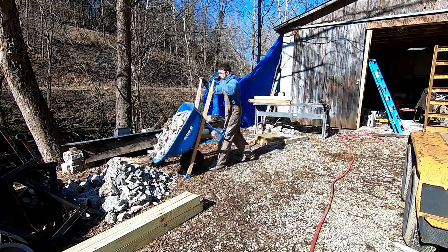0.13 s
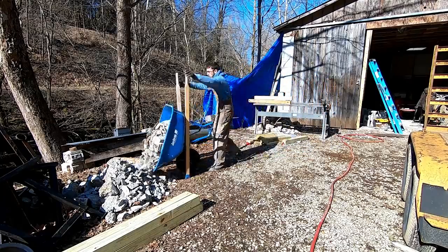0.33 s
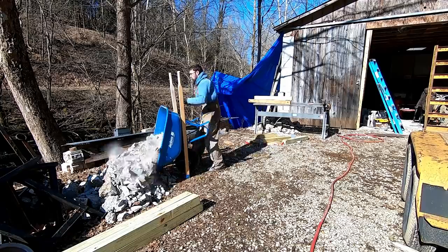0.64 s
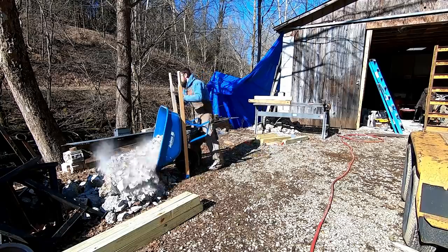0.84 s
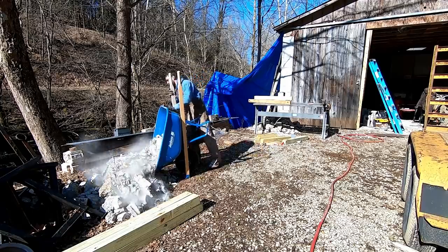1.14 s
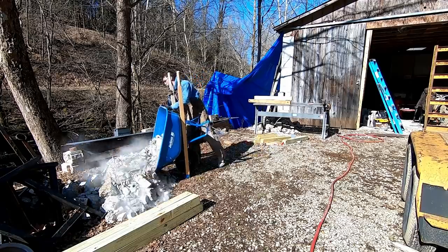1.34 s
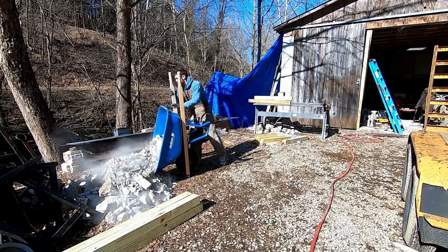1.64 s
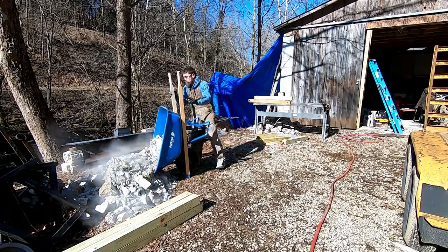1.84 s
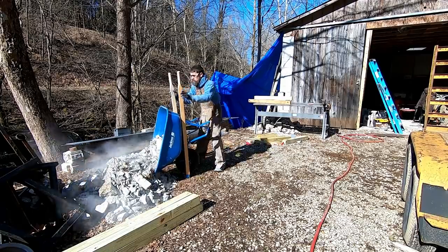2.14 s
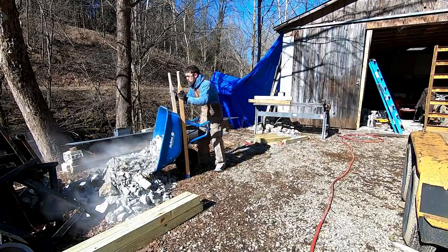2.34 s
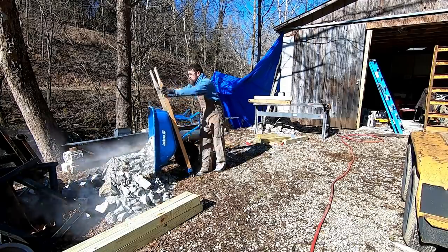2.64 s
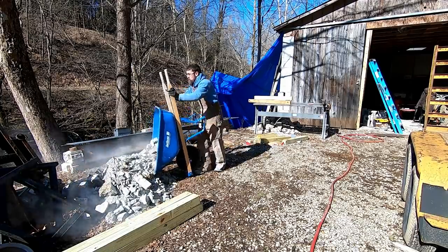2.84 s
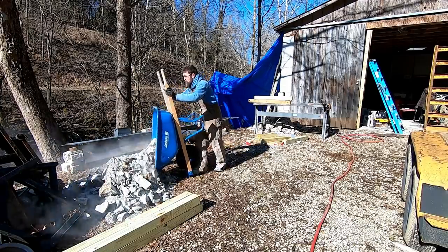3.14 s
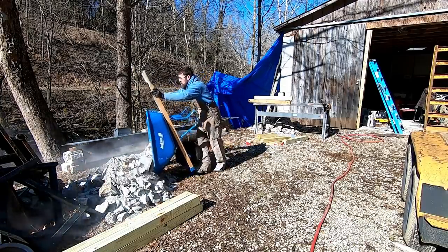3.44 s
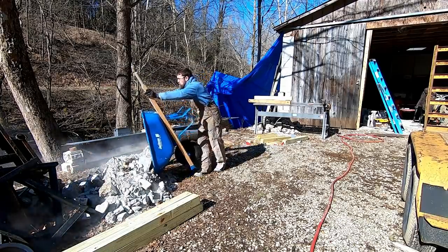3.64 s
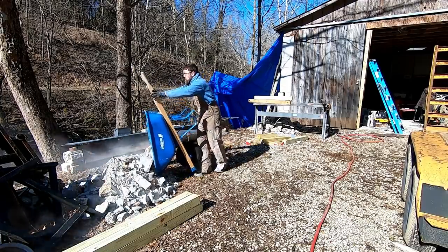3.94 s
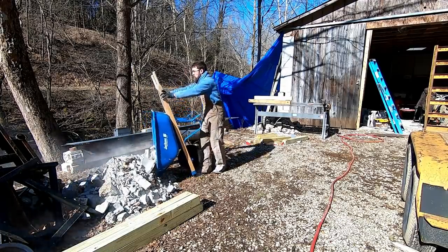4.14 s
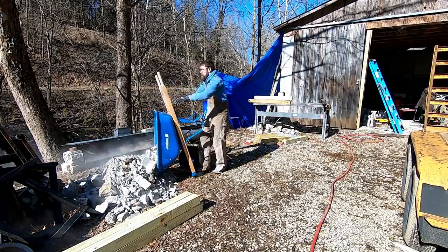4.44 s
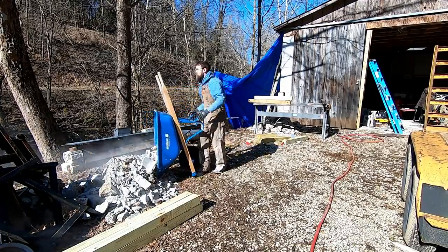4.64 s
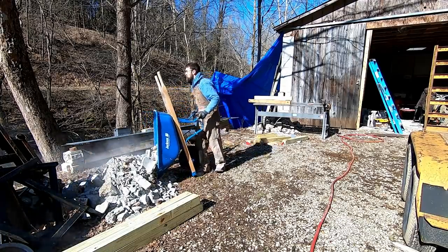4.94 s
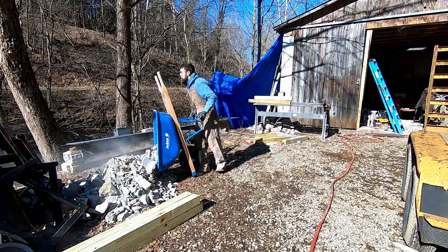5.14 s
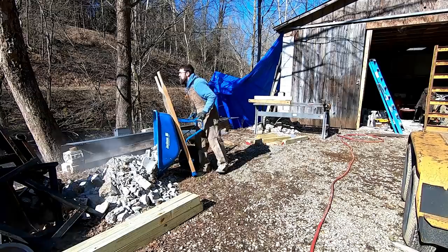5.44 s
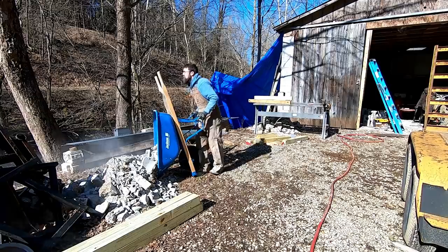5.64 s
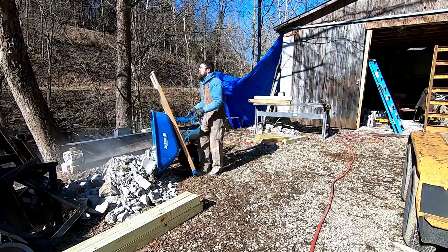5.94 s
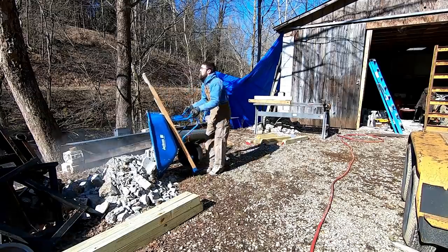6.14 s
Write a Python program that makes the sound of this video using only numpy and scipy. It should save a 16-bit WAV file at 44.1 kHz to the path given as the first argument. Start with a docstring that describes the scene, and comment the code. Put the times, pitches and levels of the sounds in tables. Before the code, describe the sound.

In an open gravel yard, concrete rubble is already sliding from a steel wheelbarrow at 0 s. It swells into a dense clatter from 0.2 to 0.6 s, with hollow tub drumming, sharp block knocks, pouring grit and a bright clink near 0.5 s. A hard double crack lands around 0.9 s, then scattered knocks and a thin squeal as it thins, with smaller tumbles at 1.4 and 1.7 s. From 2 to 2.4 s only faint ticks remain. Rocking begins near 2.5 s; a heavy, hollow knock at 2.9 s leads into scraping, knocks and clinks until about 4.3 s. Small clicks and light gravel crunches follow, quiet until a fresh scraping slide at 6 s. Low wind rumbles on the microphone throughout, with stronger buffeting from about 4 s. The yard adds only a short, diffuse tail over a faint airy wash.

```python
"""Broken concrete slides out of a tipped wheelbarrow onto a rubble pile, outdoors on a gusty day.
Blocks knock, shards clink and grit pours; after a lull the barrow is rocked and the rest scrapes out.
The slide is thousands of short damped rings and noise; blocks, shards and scuffs are placed one by one.
The yard scatters the rubble's sound; low filtered noise is the wind buffeting the microphone throughout."""
import sys
import numpy as np
from scipy import signal
from scipy.fft import rfft, irfft, next_fast_len
from scipy.io import wavfile
from scipy.ndimage import uniform_filter1d

SR = 44100
rng = np.random.default_rng(int(sys.argv[2]) if len(sys.argv) > 2 else 0)


def generate_wav(sig):
    """Save sig (samples, or channels by samples) to the path in sys.argv[1] as 16-bit PCM at SR."""
    pcm = np.round(np.clip(np.atleast_2d(sig).T, -1, 1) * 32767).astype(np.int16)
    wavfile.write(sys.argv[1], SR, pcm)


N = 277830
TIME = np.arange(N) / SR

# resonances of the steel tub: f/Hz, width/Hz, lift/dB (negative is a dip)
TUB = [(395, 42, 3), (569, 18, 2.5), (835, 49, 4), (990, 61, 4.5), (1275, 19, 3.5), (1460, 110, 1),
       (1660, 13, -2.5), (1790, 41, 3.5)]
# colour of the grit and of a shard's tick: f/Hz, level/dB
GRIT_COLOUR = [(1200, 0.5), (2400, 0.5), (3300, -0.5), (5000, -3), (6300, -4), (7000, -6.5), (8400, -2.5),
               (9300, -4.5), (10200, -14.5), (11300, -10), (12700, -10), (14300, -12.5), (16000, -21)]


def amp(db):
    """Decibels to gain."""
    return 10 ** (np.asarray(db) / 20)


def evened(x):
    """Scales to rms 1."""
    return x / np.sqrt(np.mean(x ** 2) + 1e-20)


def coloured(x, points, peaks=()):
    """Filters by a smooth spectrum with optional resonant peaks."""
    size = next_fast_len(len(x) + 2048)
    hz = np.fft.rfftfreq(size, 1 / SR)
    point_hz, point_db = np.transpose(points)
    shape_db = np.interp(np.log(hz + 1), np.log(point_hz + 1), point_db)
    for centre, width, lift_db in peaks:
        shape_db = shape_db + lift_db / (1 + (2 * (hz - centre) / width) ** 2)
    return irfft(rfft(x, size) * amp(shape_db), size)[:len(x)]


def steadied(x, size):
    """Holds the rms near 1 over windows of size samples, keeping the faster detail."""
    power = uniform_filter1d(uniform_filter1d(x ** 2, size), size)
    return x / np.sqrt(abs(power) + 1e-4 * np.mean(x ** 2))


def add(mix, s, sound):
    """Mixes a sound in at time s."""
    part = mix[max(round(s * SR), 0):][:len(sound)]
    part += sound[:len(part)]


def slide():
    """Chunks drum on the tub and tumble over each other while grit pours between them."""
    # colour of the drumming tub: f/Hz, level/dB
    drum_colour = [(80, -59), (160, 1), (225, -7.5), (300, -2), (380, -1), (540, 0.5), (720, -4),
                   (1400, -18)]
    # colour of the tumbling chunks: f/Hz, level/dB
    chunk_colour = [(250, -20), (480, -12), (680, -1.5), (1300, 0), (1900, -3), (2700, -8.5), (3700, -17),
                    (7000, -15.5)]
    # narrow rings that the small shards share: f/Hz, width/Hz, lift/dB (negative is a dip)
    shard_rings = [(4370, 24, 3.5), (5150, 51, 4.5), (5860, 53, 6.5), (6320, 38, 1), (8100, 40, 5),
                   (8500, 22, -5), (12600, 70, 5)]
    slips_per_s, slip_fall_s, slip_depth = 61, .012, 0.66
    drum_db, drum_power, max_coarseness = -6.5, 0.78, 1.16

    drum = collisions(100, 1000, cycles=1.2, spread_db=2.5, count=6000, size=700)
    chunks = collisions(400, 5000, cycles=1.9, spread_db=3.8, count=13000, size=450)
    chips = collisions(1890, 18100, cycles=1.6, spread_db=5.0, count=16000, size=128)
    shards = collisions(2500, 13000, cycles=40, spread_db=3.8, count=1300, size=2200)
    grit = chips + amp(-1.0) * shards + amp(7.5) * rng.standard_normal(N)

    # the load moves in small slips, each a sudden rise and a quick fall shared by all stone sizes
    slips = (rng.random(N) < slips_per_s / SR) * rng.exponential(1, N)
    slipping = signal.lfilter([1], [1, -np.exp(-1 / (slip_fall_s * SR))], slips)
    surge = np.sqrt(1 + slip_depth * slipping)

    # the tub drums with the chunks, more so the more they outweigh the grit, up to a limit
    chunk_gain, grit_gain = flow()
    coarseness = np.minimum(chunk_gain / grit_gain, max_coarseness)
    drum_gain = amp(drum_db) * chunk_gain * coarseness ** drum_power

    drumming = steadied(coloured(drum * surge, drum_colour, TUB), size=2800)
    tumbling = steadied(coloured(chunks * surge, chunk_colour, TUB), size=2400)
    pouring = steadied(coloured(grit * surge, GRIT_COLOUR, shard_rings), size=2400)
    return drum_gain * drumming + amp(-2.28) * chunk_gain * tumbling + amp(0.5) * grit_gain * pouring


def flow():
    """Gains of chunks and grit: the dump, then the scraping, with collapses that rise, hold and die away."""
    # the load runs out and trickles to rest, before the layer trims: t/s, chunks level/dB, grit level/dB
    dump = [(0, -24.5, -26.5), (0.1, -23, -26.5), (0.22, -18, -25), (0.5, -17.5, -19), (0.8, -35, -25.5),
            (1.25, -37.5, -32), (1.69, -32, -35.5), (1.8, -41, -43), (1.97, -41.5, -43.5), (2.08, -62, -52),
            (2.37, -57, -52.5)]
    # rubble while the barrow is rocked and dragged free, before each size's share: t/s, level/dB
    scrape = [(2.45, -40), (2.55, -37.5), (2.7, -36.5), (2.8, -30.5), (3.15, -29.5), (3.42, -25),
              (3.6, -27), (3.83, -30.5), (3.97, -26), (4.24, -27.5), (4.4, -38), (4.6, -40), (5.15, -42),
              (5.45, -47), (5.8, -45.5), (5.88, -40), (5.98, -27), (6.3, -33)]
    # heaps of chunks that give way together, before the layer trims: t/s, time from start to fall/s, level/dB
    collapses = [(0.22, 0.21, -37), (0.85, .035, -34), (1.405, 0.076, -41), (1.677, 0.032, -30),
                 (2.491, 0.11, -32.5), (2.78, 0.11, -25.5), (3.033, 0.074, -24.5), (3.38, 0.079, -20.5),
                 (3.663, 0.051, -22.5), (4.633, 0.027, -29.5), (5.035, 0.049, -36), (5.96, 0.063, -22),
                 (6.123, 0.047, -22.5)]
    chunks_share_db, grit_share_db = 2, 1.5
    rise_s, fall_s, collapse_grit_db = 0.018, 0.022, -10.5

    scraping = [(s, db + chunks_share_db, db + grit_share_db) for s, db in scrape]
    times, chunks_db, grit_db = np.vstack([dump, scraping]).T
    heaps = 0
    for s, hold, db in collapses:
        rise = np.clip((TIME - s) / rise_s, 0, 1)
        fall = np.exp(-np.maximum(TIME - s - hold, 0) / fall_s)
        heaps = heaps + amp(db) * rise * fall
    chunk_gain = np.hypot(amp(np.interp(TIME, times, chunks_db)), heaps)
    grit_gain = np.hypot(amp(np.interp(TIME, times, grit_db)), amp(collapse_grit_db) * heaps)
    return chunk_gain, grit_gain


def collisions(low_hz, high_hz, cycles, spread_db, count, size):
    """A hail of stone contacts: each a short damped ring with its own pitch and force."""
    when, pitch, damping, force, side = rng.random((count, 5)).T
    hz = low_hz * (high_hz / low_hz) ** pitch
    life = np.minimum(cycles * (.5 + damping) / hz * SR, size / 4)  # samples; higher rings die sooner
    force_db = spread_db * np.minimum(-np.log(1 - force), 4.5)  # few contacts are hard
    height = amp(force_db) * np.sign(side - .5) * np.sqrt(hz / life)
    n = np.arange(size, dtype=np.float32)
    turn = np.float32(2 * np.pi * hz / SR)[:, None]
    fall = np.float32(1 / life)[:, None]
    rings = height[:, None] * np.sin(turn * n) * np.exp(-fall * n)
    at = (when * N).astype(int)[:, None] + np.arange(size)
    return evened(np.bincount(at.ravel(), rings.ravel(), N + size)[:N])


def knock(db, hz, t60, grit_db, size=7000):
    """A block strikes, chatters on its neighbours as it settles, and crushes grit."""
    # colour of a block's cracking edge: f/Hz, level/dB
    crack_colour = [(1200, -5.5), (2400, 1), (3800, -1), (5300, -1.5), (7000, -6), (8600, -1.5),
                    (10200, -13), (12700, -14), (16000, -27)]
    t = np.arange(size) / SR
    chance, force, crunch, crumbs = rng.standard_normal((4, size))
    block = signal.butter(2, [0.46 * hz, min(1.79 * hz, SR / 3)], "bandpass", fs=SR)
    strike = signal.lfilter(*block, t == 0)
    contacts = force * (chance > 1.4)
    chatter = steadied(signal.lfilter(*block, contacts), size=200)
    settling = chatter * (1 - np.exp(-t / .0006)) * amp(-60 * t / t60)
    ring = np.sin(2 * np.pi * hz * t) * np.exp(-t * hz / 3)  # concrete rings for only a few cycles
    body = 2.6 * strike / abs(strike).max() + ring + settling

    crackle = evened(coloured(crunch * amp(3.2 * np.minimum(crumbs, 2)), crack_colour))
    crush = crackle * amp(-60 * t / (1.28 * t60)) * (1 - np.exp(-t / 0.0012))
    attack = t < .009  # both levels are set over this opening
    return amp(db) * body / np.std(body[attack]) + amp(grit_db) * crush / np.std(crush[attack])


def tub_blow(db, hz, drag, size=7000):
    """A blow and a short drag set the tub's modes ringing, most strongly those near hz."""
    t = np.arange(size) / SR
    push = rng.standard_normal(size) * np.exp(-t / drag) + 12 * (t == 0)
    modes = 0
    for mode_hz, width, _ in TUB:
        # a wider resonance dies sooner
        fade = np.exp(-np.pi * width * t - 8.8 * np.log(mode_hz / hz) ** 2)
        modes = modes + np.sin(2 * np.pi * mode_hz * t) * fade
    ring = signal.fftconvolve(push, modes)[:size]
    return amp(db) * ring / np.std(ring[t < .02])


def clink(db, hz, size=8000):
    """A flat shard ticks and rings with one strong mode, made uneven as it rocks on the stones."""
    t60_s = .07
    t = np.arange(size) / SR
    crack, rocking = rng.standard_normal((2, size))
    uneven = evened(uniform_filter1d(rocking, 150))
    ring = np.sin(2 * np.pi * hz * t + 0.77 * uneven) * amp(-60 * t / t60_s)
    tick = amp(-5.5) * evened(coloured(crack, GRIT_COLOUR)) * np.exp(-t / 0.0027)
    return amp(db) * (ring + tick)


def squeal(length, hz, db, waver=0.0033):
    """Stick and slip holds one wavering, uneven tone while an edge drags along."""
    size = int(length * SR)
    drift, grip = (evened(uniform_filter1d(row, 250))[:size] for row in rng.standard_normal((2, SR)))
    tone = np.sin(2 * np.pi * np.cumsum(hz * (1 + waver * drift)) / SR)
    return amp(db) * evened(tone * amp(3 * grip) * signal.windows.tukey(size, .5))


def scuff(length, db):
    """Gravel shifts under weight: a short swell of tiny bright snaps."""
    # colour of the gravel: f/Hz, level/dB
    gravel_colour = [(2500, -27), (5000, -26), (8500, 10), (10200, -2), (13000, 2), (16000, -17)]
    size = int(1.44 * length * SR)
    snaps, force = rng.standard_normal((2, SR // 2))[:, :size]
    crunch = evened(coloured(snaps * amp(3.6 * force), gravel_colour))
    return amp(db) * crunch * signal.windows.tukey(size, .6)


def yard(x, t60=0.16, wet_db=-18, size=14000):
    """Diffuse scatter from the gravel, the trees and the shed wall: a short tail of decaying noise."""
    t = np.arange(size) / SR
    tail = rng.standard_normal(size) * (1 - np.exp(-t / 0.0054)) * amp(-60 * t / t60)
    return x + amp(wet_db) * signal.fftconvolve(x, tail / np.linalg.norm(tail))[:N]


def wind():
    """Large eddies heave the diaphragm all the time; gusts add rumble and faster buffeting."""
    # colours of the heave, the gust rumble and the faster buffeting: f/Hz, level/dB
    heave_colour = [(2, -2), (5, 1.5), (14, 6), (22, -24.5), (32, -38), (60, -66), (150, -93)]
    rumble_colour = [(10, -30), (20, 0.5), (30, -12), (45, -3), (60, -30), (85, -58), (200, -85)]
    buffet_colour = [(35, -27), (62, 11), (90, 1), (125, -3.5), (175, -15.5), (260, -24.5), (600, -74)]
    heave = steadied(coloured(rng.standard_normal(N), heave_colour), size=6000)
    rumble = steadied(coloured(rng.standard_normal(N), rumble_colour), size=4000)
    buffet = steadied(coloured(rng.standard_normal(N), buffet_colour), size=3500)
    rumble_gain, buffet_gain = gusting()
    return amp(-14.0) * heave + amp(-2.0) * rumble_gain * rumble + amp(1.5) * buffet_gain * buffet


def gusting():
    """Gains of rumble and buffeting: each gust is a bell-shaped swell over a steady breeze."""
    # gusts at the microphone, before the layer trims:
    # peak t/s, standard deviation/s, rumble level/dB, buffeting level/dB
    gusts = [(0.47, 0.047, -45, -54), (0.73, 0.057, -23, -41), (1.5, 0.057, -18, -44.5),
             (2.03, 0.087, -18, -46), (2.27, 0.033, -17, -39), (2.75, .1, -20.5, -35),
             (3.07, 0.17, -19, -32.5), (3.44, 0.075, -21, -28.5), (4.04, 0.11, -13.5, -23.5),
             (4.25, 0.078, -14.5, -19.5), (4.55, 0.13, -17, -28), (4.83, 0.15, -16, -24),
             (5.18, 0.15, -18.5, -36), (5.58, 0.16, -16, -22.5), (6.02, 0.13, -14.5, -27.5)]
    rumble, buffet = amp(-33), amp(-52.5)  # the breeze between the gusts
    for s, width, rumble_db, buffet_db in gusts:
        swell = np.exp(-((TIME - s) / width) ** 2 / 2)
        rumble = np.hypot(rumble, amp(rumble_db) * swell)
        buffet = np.hypot(buffet, amp(buffet_db) * swell ** 1.28)  # a little briefer
    return rumble, buffet


def air():
    """The faint wash of the open yard and woods: steady filtered noise."""
    # colour of the distant wash: f/Hz, level/dB
    air_colour = [(100, 21), (400, 3.5), (1400, 5.5), (2500, 0), (9000, -10), (10200, -8), (15000, -11)]
    return amp(-46.5) * evened(coloured(rng.standard_normal(N), air_colour))


def scene():
    """Rubble in the yard, with wind on the microphone."""
    # blocks landing: t/s, opening level/dB, f/Hz, chatter t60/s, crushed grit opening level/dB
    knocks = [(0.164, -17.5, 1480, 0.16, -18.5), (0.242, -20, 1300, 0.13, -20),
              (0.305, -16.5, 1310, 0.15, -42), (0.356, -16.5, 1600, 0.23, -26), (0.571, -20, 1040, .1, -25),
              (0.777, -20, 3060, .05, -31), (0.871, -14, 1710, 0.075, -22), (0.88, -15, 1670, 0.21, -28),
              (0.948, -20, 1460, 0.082, -22.5), (1.055, -30, 1160, 0.072, -27),
              (1.072, -22, 860, 0.034, -35), (1.176, -20, 1140, 0.059, -29), (1.224, -28, 960, 0.037, -45),
              (1.314, -31, 3110, 0.046, -32.5), (1.409, -23.5, 1800, 0.35, -45),
              (1.428, -22, 770, 0.25, -34), (1.671, -30.5, 2290, 0.27, -29), (1.943, -45, 2600, 0.037, -40),
              (2.216, -32.5, 3100, 0.032, -36.5), (2.832, -25, 850, 0.079, -23.5),
              (2.884, -19.5, 900, 0.14, -46), (2.903, -15, 900, 0.3, -42), (2.917, -15, 835, 0.063, -40),
              (3.129, -18.5, 720, 0.07, -28), (3.203, -21.5, 2660, 0.18, -42), (3.282, -22, 840, 0.17, -27),
              (3.346, -21, 2780, 0.19, -38), (3.493, -18.5, 1340, 0.072, -38),
              (4.036, -26, 2200, 0.15, -25), (4.24, -31, 2800, 0.063, -21.5),
              (4.666, -38, 1030, 0.12, -33.5), (6.005, -22, 920, 0.12, -46), (6.153, -25, 1790, 0.14, -38),
              (6.239, -36, 1040, 0.092, -28)]
    # blocks that hit the tub and drag on it: t/s, opening level/dB, strongest f/Hz, drag decay/s
    tub_blows = [(0.303, -19, 1500, 0.0068), (0.872, -24, 1610, 0.0076), (1.409, -25.5, 600, .034),
                 (1.486, -25.5, 870, 0.011), (1.671, -33, 1600, 0.0067), (2.904, -15.5, 880, 0.0075),
                 (3.132, -26.5, 580, 0.0043), (3.283, -21, 790, 0.0051), (3.426, -24.5, 1400, 0.03),
                 (4.32, -34, 1190, .004), (5.026, -34, 1320, 0.0043)]
    # shards that ring: t/s, ring's starting peak level/dB, f/Hz
    clinks = [(0.276, -19, 5900), (0.514, -12, 4630), (0.628, -19, 6260), (0.726, -20, 5470),
              (1.167, -21, 7360), (1.58, -29, 3750), (2.06, -33.5, 5220), (2.149, -36.5, 7019),
              (2.15, -30, 5200), (2.177, -41, 5600), (2.313, -42, 5260), (3.244, -24, 8560),
              (3.515, -18, 6500), (3.703, -21, 6560), (3.79, -22.5, 8400), (3.805, -27, 14685),
              (4.61, -31, 5170), (4.89, -27, 4680)]
    # stone edges squealing on the steel: t/s, length/s, f/Hz, level/dB
    squeals = [(0.99, 0.063, 8320, -37), (1.045, 0.16, 3365, -39), (3.25, 0.11, 5000, -37),
               (3.985, .07, 5640, -40)]
    # gravel under boots and barrow: t/s, length before stretch/s, level before the swell/dB
    scuffs = [(2.827, 0.021, -31.5), (4.159, 0.049, -29.5), (4.842, 0.074, -46), (5.015, 0.041, -46),
              (5.155, 0.048, -38.5), (5.944, 0.036, -43), (6.126, 0.043, -32)]

    rubble = slide()
    for source, table in [(knock, knocks), (tub_blow, tub_blows), (clink, clinks),
                          (squeal, squeals), (scuff, scuffs)]:
        for s, *settings in table:
            add(rubble, s, source(*settings))
    eased = signal.windows.tukey(N, .012)  # the wind fades in and out at the very ends
    return (yard(rubble) + air() + eased * wind())[None]


def record(dry):
    """The loudest peaks are rounded off; then the band limit."""
    edge_hz = 15750
    rounded = dry / (1 + dry ** 6) ** (1 / 6)
    lowpass = signal.firwin(511, edge_hz, window=("kaiser", 9), fs=SR)
    return signal.oaconvolve(rounded, lowpass[None], "same")


dry = scene()
out = record(dry)
generate_wav(out)
```